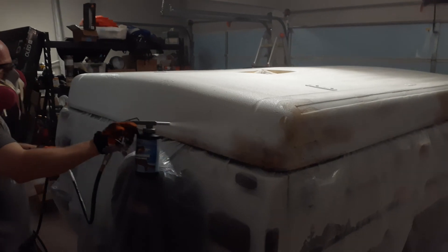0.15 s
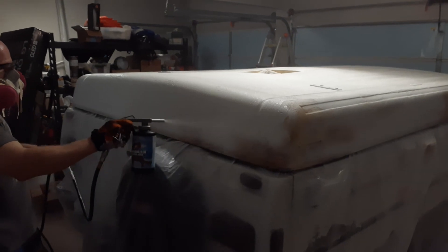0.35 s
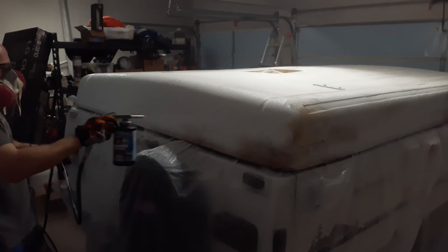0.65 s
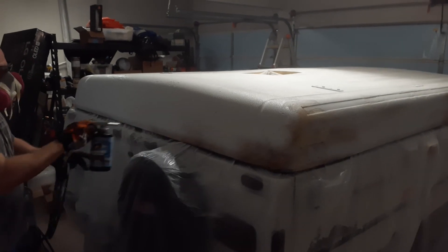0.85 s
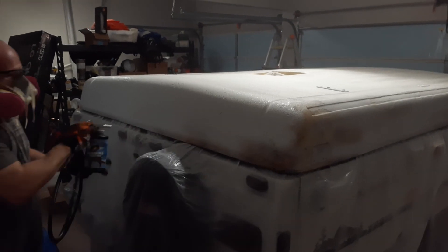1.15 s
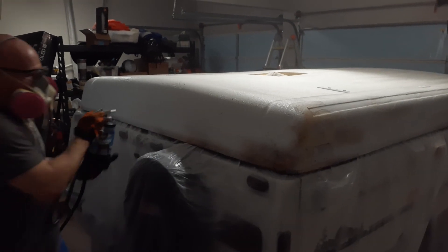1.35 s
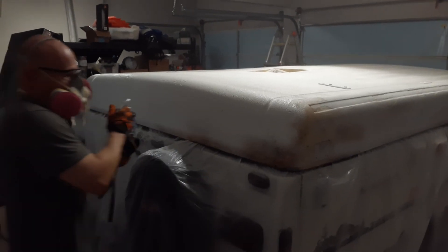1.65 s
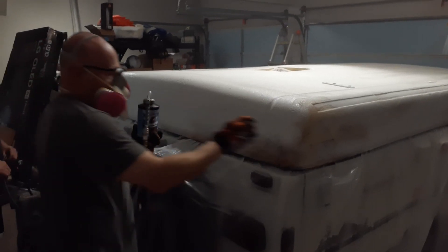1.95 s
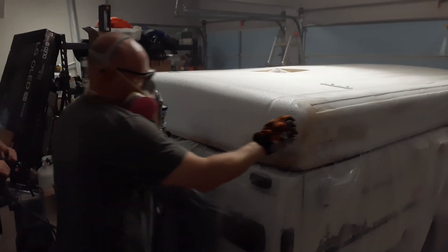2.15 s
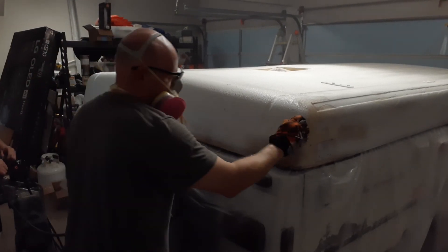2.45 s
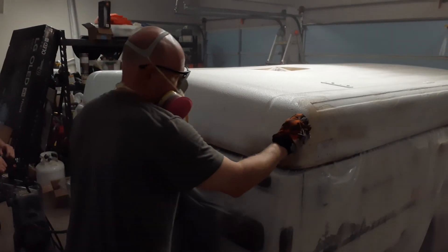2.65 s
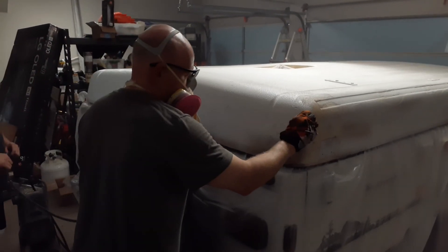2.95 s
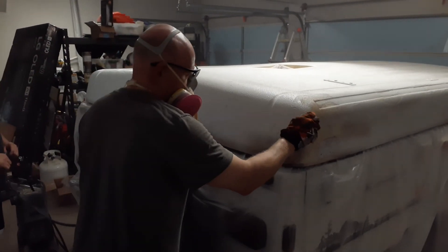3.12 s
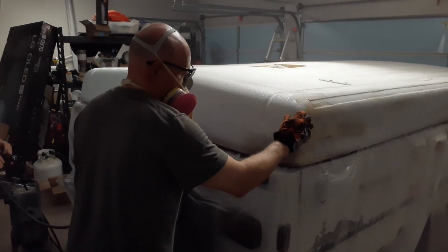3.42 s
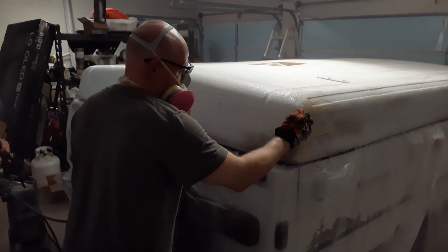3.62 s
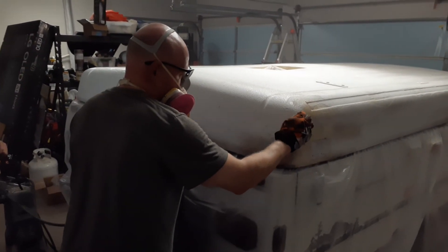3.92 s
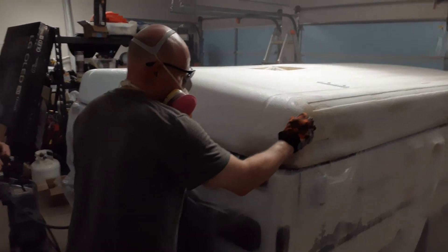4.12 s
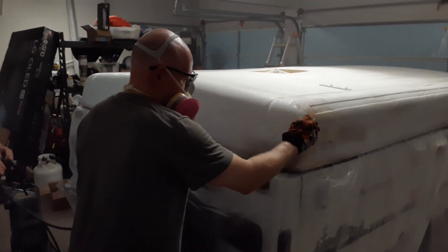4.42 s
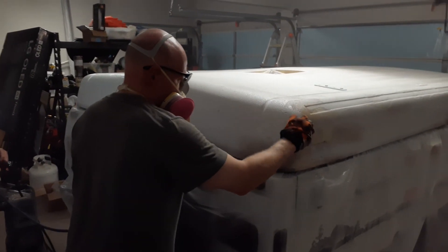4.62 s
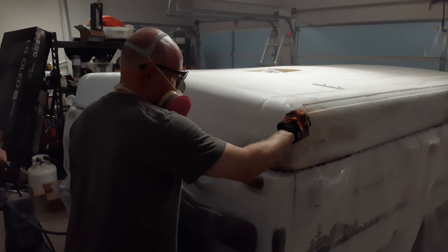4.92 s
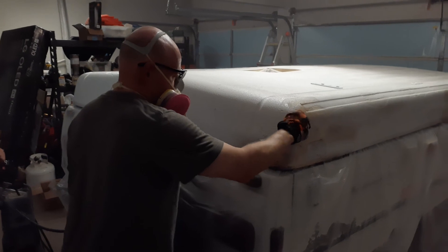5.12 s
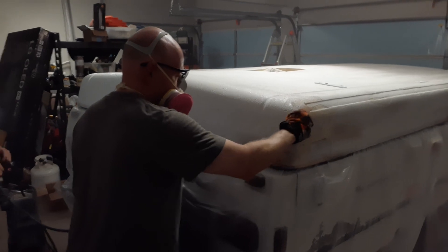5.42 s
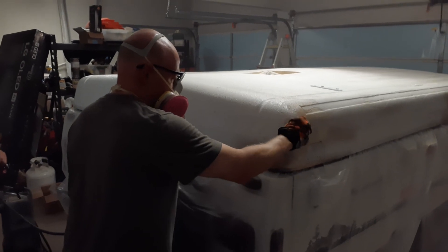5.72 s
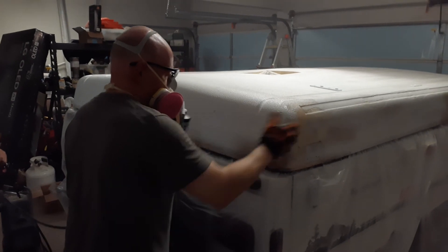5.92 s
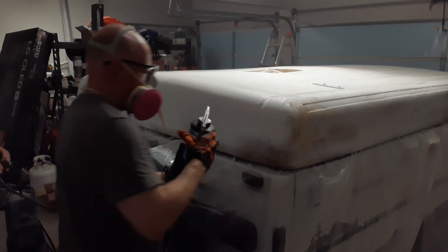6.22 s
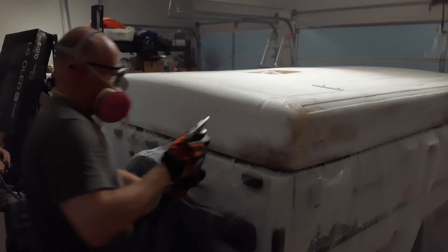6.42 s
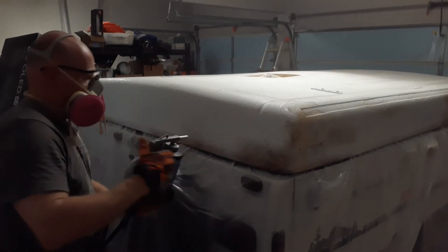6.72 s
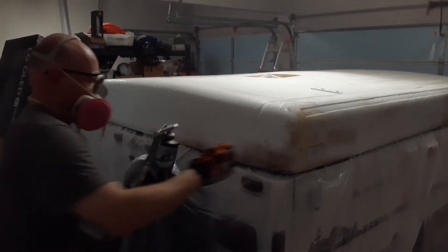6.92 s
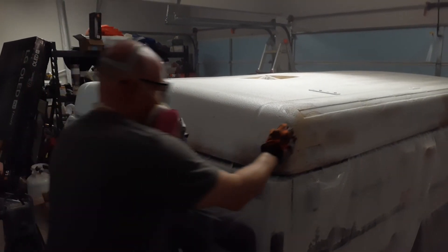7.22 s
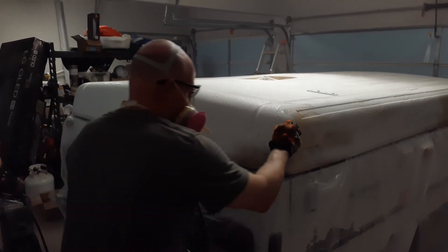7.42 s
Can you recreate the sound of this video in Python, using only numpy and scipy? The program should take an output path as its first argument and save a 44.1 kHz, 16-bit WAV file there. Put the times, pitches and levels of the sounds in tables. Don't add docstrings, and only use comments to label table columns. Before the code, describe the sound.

A spray gun hisses sharply with buffeting wind for under a second, then a piston air compressor drones on, swelling louder in a closed garage.

```python
import sys
import numpy as np
from scipy import signal
from scipy.fft import rfft, irfft
from scipy.io import wavfile

SR = 44100
rng = np.random.default_rng(int(sys.argv[2]) if len(sys.argv) > 2 else 0)


def decibels_to_gain(level_db):
    exponent = np.asarray(level_db, float) / 20
    return 10 ** exponent


def wav_out(sig):
    wavfile.write(sys.argv[1], SR, np.round(np.clip(np.atleast_2d(sig).T, -1, 1) * 32767).astype(np.int16))


N = 333690

SHAFT_HZ = 51.92
MAINS_HZ = 60
# (left level [dB], right level [dB], left lead [rad])
DRONE_ORDERS = [(-57, -57, 0.0), (-43, -48, 0.0), (-47, -46, -0.5), (-47, -50, 0.2), (-30, -36, 0.4),
                (-20, -22, -0.1), (-26, -34, 0.7), (-31, -36, -1.0), (-38, -25, -1.0), (-38, -38, 1.0),
                (-36, -37, -0.7), (-32, -34, -0.5), (-37, -30, -1.0), (-17, -22, 0.8), (-28, -34, 2.5),
                (-29, -27, -2.3), (-33, -39, -2.6), (-45, -40, 0.6), (-43, -46, 2.5), (-47, -53, 1.9),
                (-44, -51, 1.1), (-34, -42, -3.0), (-42, -38, 3.1), (-52, -42, -0.5), (-44, -47, 0.1),
                (-37, -53, -0.0), (-49, -45, -0.2), (-33, -38, -2.9), (-51, -54, -2.7), (-40, -42, 2.8)]
VALVE_ORDERS = [31, 33, 34, 35, 38, 39, 40, 46, 48, 49, 50, 51, 224, 225, 226]
# (left level [dB], right level [dB])
VALVE_LEVELS = [(-47, -43), (-50, -44), (-46, -60), (-48, -46), (-38, -38), (-52, -44), (-43, -49),
                (-48, -48), (-52, -48), (-50, -48), (-54, -37), (-56, -48), (-53, -39), (-50, -44),
                (-52, -46)]
HUM_LEVELS = [-64, -55.5, -50, -49, -52.5]
# (frequency [Hz], level per multiple [dB])
CLATTER_SPECTRUM = [(1550, -52.5), (2100, -49), (2700, -56.5), (3300, -56), (5000, -60.5), (7200, -62.5),
                    (8500, -61), (10500, -54), (12800, -59.5), (15600, -64)]
# (frequency [Hz], level [dB per Hz])
RUSH_SPECTRUM = [(20, -88), (60, -86), (130, -78), (230, -69), (550, -57.5), (900, -63.5), (1400, -66),
                 (2600, -70), (6000, -72), (7300, -74), (8500, -67), (12800, -70.5), (15600, -79)]
# (frequency [Hz], likeness [-1 to 1])
RUSH_LIKENESS = [(30, .45), (150, 0.093), (250, 0.45), (600, 0.14), (1000, -0.0096), (1900, -0.13),
                 (3000, -0.012)]
# (frequency [Hz], level [dB per Hz])
JET_SPECTRUM = [(300, -79), (1500, -75), (2200, -70), (4000, -65.5), (6000, -62.5), (7200, -63),
                (8500, -55.5), (10500, -52), (14000, -57), (15000, -55), (15700, -67)]
# (frequency [Hz], level [dB per Hz])
BUFFET_SPECTRUM = [(20, -30), (45, -9), (70, -0.5), (110, 0), (400, -3.5), (900, -6), (1800, -6),
                   (3000, -12.5), (6000, -16)]
# (time [s], peak level [dB])
POPS = [(0.064, -16), (0.114, -25), (0.189, -16), (0.254, -23), (0.296, -5), (0.337, -7), (0.394, -11),
        (0.419, -18), (0.467, -14), (0.495, -5), (0.516, -11), (0.548, -12), (0.586, -16), (0.671, -27)]
# (frequency [Hz], level [dB])
RIGHT_PORT = [(60, -4), (1000, -4), (1700, -0.6), (2600, 4.5), (3200, -0.6), (6000, 3.5), (6700, 3),
              (7300, -26), (7800, -32), (8600, -49), (10200, -23), (11000, -4), (11800, 0), (14000, 1.5),
              (15600, -1.5)]
# (time [s], left delay [ms], right delay [ms])
PANEL_ECHO = [(0, 1.06, 0.83), (.35, 1.02, 0.71), (.7, .9, 0.72)]
# (start [s], length [s], centre [Hz], width [Hz], level [dB])
RUSTLES = [
    (6.62, .45, 1920, 324.1, -40),
    (6.652, 0.51, 1150, 250, -37),
]
# (time [s], lift of the rumble [dB])
THUMPS = [(.012, -10), (.07, 6), (.117, 8), (.2, 9), (.265, 1), (.335, 6.5), (.425, 7), (.468, 10),
          (.557, 7), (.675, 5)]
# (start [s], time taken [s], standing back [0-1], bent in [0-1])
MOVES = [
    (0, .1, 0.77, .1),
    (1.0, .5, 0.77, 0.24),
    (1.9, 0.55, 0.25, 0.12),
    (6.0, .5, 0.6, 0),
    (6.6, 0.51, 0, .65),
    (7.2, .35, 0.34, 0.87),
]
# (multiple [1], back: left [dB], right [dB], bent: left [dB], right [dB])
SHIFTS = [(3, 2.5, .5, 4, 1.5), (6, 0, -1.5, -1.5, -1.5), (7, 0, 4, -3.5, -7), (8, -3, 3, -7, -3),
          (9, -2, 0, 1, .5), (10, 4, -2, -11, 1), (12, 7.5, 6, -10, -14), (13, 0, -6, -4, -10),
          (14, -2.5, -2.5, -1.5, -3), (15, 6, 9, 5, 6), (16, -6, 2.5, -4, -5), (17, -2, -2, -10, 0),
          (21, 6.5, 5, 8, 8), (22, 0, 0, -6, 11), (23, 0, 1, 4, 3), (26, 0, 5, 5, 8), (27, 12, 2, 8, 6),
          (28, -4, 0, -3, -2)]

RELEASE_S = 0.66


def seconds():
    return np.arange(N) / SR


def in_time(rows):
    s, *columns = np.transpose(rows)
    return [np.interp(seconds(), s, column) for column in columns]


def at_hz(points, hz):
    point_hz, value = np.array(points)[:, 0], np.array(points)[:, 1]
    return np.interp(np.log(hz + 1e-9), np.log(point_hz), value)


def drift(rate, count):
    r = np.exp(-400 * np.pi * rate / SR)
    raw = rng.standard_normal((count, N // 200 + 1002))
    slow = signal.lfilter([1], [1, -2 * r, r * r], raw)[:, 1000:]
    slow = slow / slow.std(axis=1, keepdims=True)
    return np.array([np.interp(np.arange(N) / 200, np.arange(len(row)), row) for row in slow])


def noise(spectrum, likeness):
    hz = np.fft.rfftfreq(N, 1 / SR)
    mid, side = rfft(rng.standard_normal((2, N))) * decibels_to_gain(at_hz(spectrum, hz)) * np.sqrt(SR / 4)
    alike = np.clip(at_hz(likeness, hz), -1, 1)
    mid, side = np.sqrt(1 + alike) * mid, np.sqrt(1 - alike) * side
    return irfft([mid + side, (mid - side) * decibels_to_gain(at_hz(RIGHT_PORT, hz))], N)


def tone(turns, left_db, right_db, lead, start):
    angle = 2 * np.pi * turns + start
    return np.sqrt(2) * np.array([decibels_to_gain(left_db) * np.cos(angle + lead), decibels_to_gain(right_db) * np.cos(angle)])


def shaft_turns(wobble):
    return np.cumsum(SHAFT_HZ * (1 + wobble * drift(0.788, count=1)[0])) / SR


def posture():
    rows = []
    old = MOVES[0][2:]
    for start_s, took_s, *new in MOVES:
        rows += [(start_s, *old), (start_s + took_s, *new)]
        old = new
    return in_time(rows)


def air_rush(turns, pulse_db, patchy_db):
    pulse = np.cos(2 * np.pi * turns) + 0.47 * np.cos(8 * np.pi * turns)
    level_db = pulse_db * pulse + patchy_db * drift(5.3, count=2)
    return noise(RUSH_SPECTRUM, RUSH_LIKENESS) * decibels_to_gain(level_db)


def motor_hum():
    hum = 0
    for k, level_db in enumerate(HUM_LEVELS):
        hum = hum + tone(2 * (k + 1) * MAINS_HZ * seconds(), level_db, level_db, 0, k)
    return hum


def rustle():
    out = np.zeros((2, N))
    for s, length, hz, width_hz, level_db in RUSTLES:
        size, start = int(length * SR), int(s * SR)
        band = signal.butter(2, [hz - width_hz / 2, hz + width_hz / 2], "band", fs=SR, output="sos")
        rub = signal.sosfilt(band, rng.standard_normal(SR))[:size] * np.sqrt(SR / 2 / width_hz)
        out[:, start:start + size] += decibels_to_gain(level_db) * rub * np.hanning(size)
    return out


def buffeting(lumpy_db, split_hz, level_db, pop_db, burst, leak_db):
    calm_db = -500 * np.maximum(seconds() - RELEASE_S - 0.014, 0)
    thump_s = 0.028
    thump_db = sum(lift_db * np.exp(-((seconds() - s) / thump_s * 2) ** 2) for s, lift_db in THUMPS)
    rumble_db, flap_db = -35.5 + thump_db + calm_db, -35 + calm_db

    eddies = noise(BUFFET_SPECTRUM, [(100, 0.01), (10000, 0.01)])
    low = signal.sosfilt(signal.butter(2, split_hz, fs=SR, output="sos"), eddies)
    gusts = low * decibels_to_gain(rumble_db - 24.5) + (eddies - low) * decibels_to_gain(flap_db - 23)

    hits = np.zeros(N)
    hits[[round(s * SR) for s, db in POPS]] = decibels_to_gain(np.array(POPS)[:, 1] + 9.5)
    swell = 1 + burst * np.convolve(hits, np.hanning(600), "same")
    gusts = gusts * swell * decibels_to_gain(level_db + lumpy_db * drift(33, count=2))

    clicks = hits * decibels_to_gain(pop_db) * rng.choice([-1, 1], N)
    dull = signal.butter(2, [110, 1500], "band", fs=SR, output="sos")
    pops = signal.sosfilt(dull, clicks + 1e-18)
    return (gusts + pops) * decibels_to_gain(np.array([[0], [leak_db]]))


def trigger_db():
    after = np.maximum(seconds() - RELEASE_S, 0)
    held = 16 - 2.5 * np.minimum(seconds(), RELEASE_S)
    tail = -14 - 48 * np.maximum(after - .25, 0)
    return np.maximum(held - 128 * after, tail)


def spray(flicker_db, echo):
    jet, samples = noise(JET_SPECTRUM, [(100, .05), (10000, 0.042)]), np.arange(N)
    late = []
    for delay_ms, side in zip(in_time(PANEL_ECHO), jet):
        delay = np.round(delay_ms * SR / 250) / 4
        late.append(np.interp(samples - delay, samples, side))
    return (jet + echo * np.array(late)) * decibels_to_gain(trigger_db() + flicker_db * drift(14, count=2))


def clatter(turns, hold_s):
    size, orders = 8192, np.arange(31, 305)
    place = (turns % 1 * size).astype(int)
    hz = orders * SHAFT_HZ
    port_db = np.array([0 * orders, at_hz(RIGHT_PORT, hz)])
    level = decibels_to_gain(at_hz(CLATTER_SPECTRUM, hz) + port_db) * size / 2

    def chance():
        return rng.standard_normal((2, len(orders))) + 1j * rng.standard_normal((2, len(orders)))

    lasting = chance()
    step, out = seconds() / hold_s, np.zeros((2, N))
    for k in range(int(step[-1]) + 2):
        spectrum = np.zeros((2, size // 2 + 1), complex)
        spectrum[:, orders] = level * (0.82 * lasting + 0.69 * chance())
        near = np.abs(step - k) < 1
        fade = np.cos(np.pi / 2 * (step[near] - k))
        out[:, near] += irfft(spectrum, size)[:, place[near]] * fade
    return out


def valves(turns, flutter_db):
    size = 8192
    spectrum = np.zeros((2, size // 2 + 1), complex)
    phase = 2 * np.pi * rng.random(len(VALVE_LEVELS)) + np.array([[0], [2.7]])
    spectrum[:, VALVE_ORDERS] = decibels_to_gain(np.transpose(VALVE_LEVELS)) * np.exp(1j * phase) * size / np.sqrt(2)
    back, bent = posture()
    ring_db = -6.5 * back - 2.5 * bent + flutter_db * drift(3.3, count=2)
    return irfft(spectrum, size)[:, (turns % 1 * size).astype(int)] * decibels_to_gain(ring_db)


def drone(turns, wander_db, flutter_db, smear, scatter, stirred_db):
    back, bent = [curve[::8] for curve in posture()]
    wander, flutter = drift(0.91, count=12)[:, ::8], drift(11.6, count=12)[:, ::8]
    starts = smear * (np.arange(30) / 10) ** 4 + np.pi + scatter * rng.standard_normal(30)
    shift = stirred_db * np.arange(30)[:, None] / 30 * rng.standard_normal((30, 4))
    for order, *change in SHIFTS:
        shift[order - 1] = change

    out = 0
    for k, (left_db, right_db, lead) in enumerate(DRONE_ORDERS):
        weak = np.clip((-16.0 - max(left_db, right_db)) / 20, .1, 1)
        port_db = []
        for port, level_db, row in ((0, left_db, k % 12), (1, right_db, (k + 5) % 12)):
            chance = weak * (wander_db * k / 30 * wander[row] + flutter_db * flutter[row])
            moved = back * shift[k, port] + bent * shift[k, port + 2]
            port_db.append(level_db + moved + chance)
        centre = np.angle(1 + decibels_to_gain(left_db - right_db) * np.exp(1j * lead))
        out = out + tone((k + 1) * turns[::8], *port_db, lead, starts[k] - centre)
    return signal.resample_poly(out, 8, 1, axis=1)[:, :N]


def scene():
    turns = shaft_turns(wobble=.0002)
    compressor = air_rush(turns, pulse_db=0.24, patchy_db=0.43) + motor_hum()
    compressor = compressor + clatter(turns, hold_s=0.905) + valves(turns, flutter_db=2.0)
    compressor = compressor + drone(turns, wander_db=1.5, flutter_db=.9, smear=-50.0, scatter=.05, stirred_db=3)
    wind = buffeting(lumpy_db=1.0, split_hz=520, level_db=20.0, pop_db=18, burst=0.94, leak_db=-34)
    jet = spray(flicker_db=.4, echo=.38)
    return compressor + jet + wind + rustle()


def gain_control_db():
    jet_db, wait_db, full_db = -15.5, -10, 0.96
    ease_s, climb_start_s, climb_end_s = 0.25, 1.78, 2.6
    eased = 1 - np.exp(-np.maximum(seconds() - RELEASE_S, 0) / ease_s * 3)
    climbed = np.clip((seconds() - climb_start_s) / (climb_end_s - climb_start_s), 0, 1)
    return jet_db + (wait_db - jet_db) * eased + (full_db - wait_db) * climbed


def band_limit(x):
    return signal.sosfilt(signal.butter(12, 16350, fs=SR, output="sos"), x)


def record(dry):
    held = 1.1 * np.tanh(dry * decibels_to_gain(gain_control_db()) / 1.1)
    top_cut = signal.ellip(12, .5, 60, 15750, fs=SR, output="sos")
    mix = signal.sosfilt(top_cut, held)
    return band_limit(mix)


dry = scene()
out = record(dry)
wav_out(out)
```